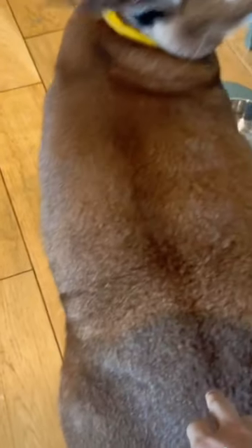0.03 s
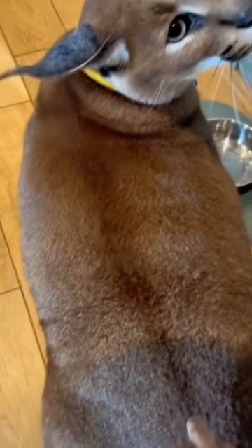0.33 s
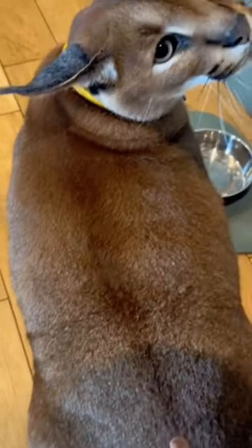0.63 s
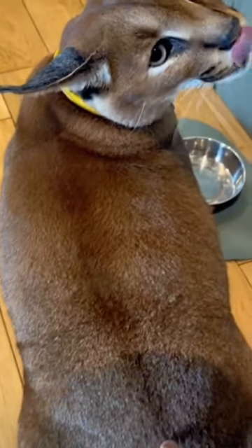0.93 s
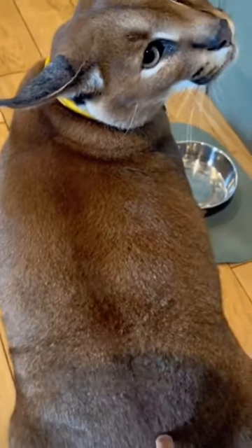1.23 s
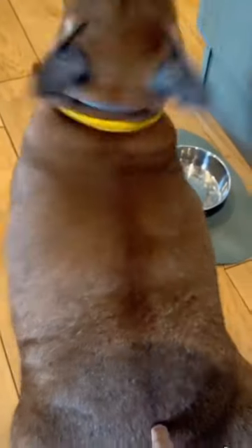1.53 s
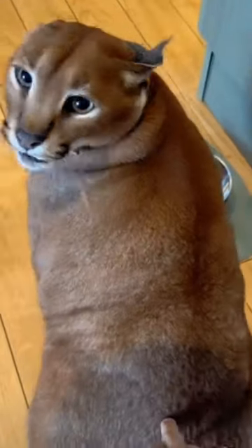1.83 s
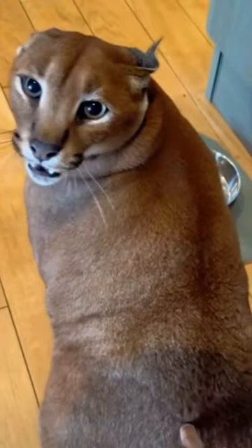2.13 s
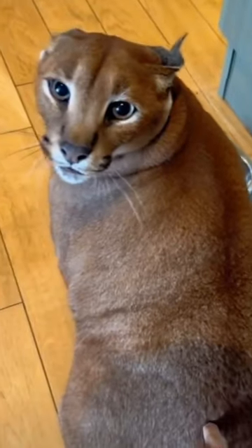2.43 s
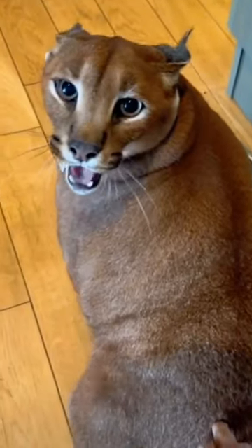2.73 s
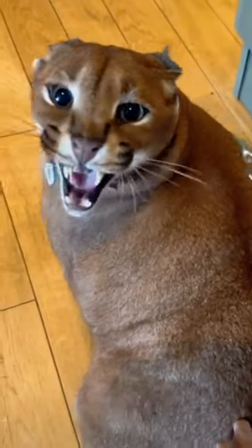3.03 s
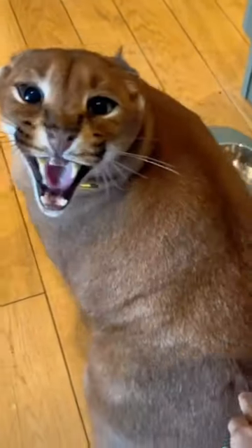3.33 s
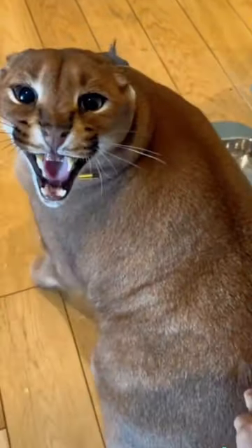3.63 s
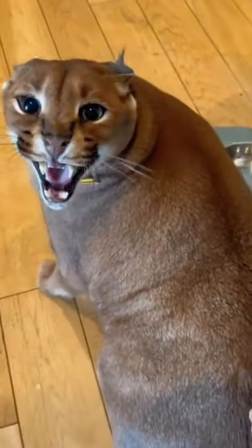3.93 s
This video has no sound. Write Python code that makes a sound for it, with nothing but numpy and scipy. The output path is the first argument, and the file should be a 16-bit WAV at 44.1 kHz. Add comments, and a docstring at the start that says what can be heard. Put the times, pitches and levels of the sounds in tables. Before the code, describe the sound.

A wild cat growls low, licks its lips and slips into a slower, rattling snarl. It draws a breath, then lets out a loud, wet hiss, heard from about a metre away in a quiet room.

```python
"""A wild cat growls and hisses

Pulses of the vocal folds excite chest and throat in a low growl, mouth shut. The cat licks its lips
and bares its teeth in a slower, rattling snarl. It draws air through the opening jaws, then turbulent
flow, shaped by the resonances of the mouth, makes a loud, wet hiss that sinks to a steady rasp.
A quiet room with a wooden floor, heard in mono from about a metre."""
import sys
import numpy as np
from scipy import signal
from scipy.fft import rfft, irfft, next_fast_len
from scipy.io import wavfile
from scipy.ndimage import uniform_filter1d

SR = 44100
rng = np.random.default_rng(int(sys.argv[2]) if len(sys.argv) > 2 else 0)


def store_pcm(level_fs):
    """Save levels as 16-bit WAV."""
    pcm = np.round(np.clip(level_fs, -1, 1) * 32767).astype(np.int16)
    wavfile.write(sys.argv[1], SR, np.atleast_2d(pcm).T)


N = 176400
TIME = np.arange(N) / SR


def hiss():
    """Turbulence excites the vocal tract: a throat blast, a wet rasp and a jet between the teeth."""
    # Each row: time in seconds, then levels of blast, rasp and jet in dB.
    hiss_levels = [(3.042, -58, -63, -67), (3.058, -39, -38.5, -51.5), (3.095, -36, -45.5, -41.5),
                   (3.145, -32, -37.5, -39), (3.2, -33, -38.5, -38), (3.235, -35, -52, -36.5),
                   (3.262, -28, -46, -35.5), (3.295, -30, -36, -32), (3.35, -29, -38, -37.5),
                   (3.4, -35.5, -35, -36.5), (3.46, -40, -37.5, -39.5), (3.53, -61, -38, -43),
                   (3.6, -47, -39, -44), (3.72, -43.5, -40.5, -43.5), (4.0, -50.5, -39, -43)]
    # Spectral envelopes. Each row: frequency in Hz, gain in dB.
    blast_colour = [(100, -24), (220, -4.5), (420, -1.5), (800, 4.5), (930, -2), (1100, 2.5), (1320, 0.5),
                    (1550, 3.5), (2000, 6.5), (2700, 0.5), (3400, -1), (4200, -7), (5500, -20),
                    (11000, -40), (12000, -75)]
    rasp_colour = [(80, -37.5), (200, -6.5), (350, -4.5), (530, 2), (700, -7), (1000, -12.5), (1700, -9.5),
                   (2100, -15), (3000, -12), (4200, -19), (5500, -19.5), (10000, -57), (12000, -85)]
    jet_colour = [(2500, -24.5), (4500, -3.5), (5900, -2.5), (6600, 1), (7600, 6), (9000, 0.5),
                  (11050, -4.5), (11350, -14), (11700, -12.5), (12000, -46), (15000, -33)]
    # Resonances and notches. Each row: centre in Hz, width in Hz, gain in dB.
    blast_peaks = [(431, 113, 10.5), (1112, 72, 8), (1550, 95, 5.5), (2420, 160, 5), (2649, 81, 10),
                   (3160, 65, 7.5)]
    rasp_peaks = [(512, 140, 1.5), (826, 120, 7), (2115, 220, 8), (2650, 82, -4), (4630, 68, 9),
                  (5610, 130, 9)]
    jet_peaks = [(6150, 38, 11.5), (6600, 120, 6.5), (7000, 120, 6), (7370, 320, -4.5), (8680, 160, -2)]
    # A film of spittle gives way. Each row: time in seconds, lift in dB.
    sputters = [(3.199, 2.5), (3.222, 3.5), (3.491, 2.5), (3.732, 1.5), (3.752, 3.5), (3.855, 5.5)]
    sputter_s = .0025
    blast_gain, rasp_gain, jet_gain = levels(hiss_levels)
    blast = colour(airflow(flutter_db=3, flutter_hz=90, wet=.34), blast_colour, blast_peaks)
    rasp = colour(airflow(flutter_db=2.5, flutter_hz=111, wet=.35), rasp_colour, rasp_peaks)
    jet = colour(airflow(flutter_db=1.5, flutter_hz=70.4, wet=.18), jet_colour, jet_peaks)
    stream = blast_gain * evened(blast) + rasp_gain * evened(rasp) + jet_gain * evened(jet) + gape()
    flutter = evened(from_db(.45 * drift(rate_hz=55)))  # the throat shakes the whole airstream
    sputter = from_db(sum(db * np.exp(-((TIME - s) / sputter_s) ** 2) for s, db in sputters))
    return sputter * flutter * stream


def gape():
    """A cavity resonance in the hiss climbs as the jaws widen and drops as they relax."""
    # Each row: time in seconds, resonance in Hz.
    gape_hz = [(3.06, 2100), (3.2, 2250), (3.29, 2750), (3.345, 3700), (3.38, 4702), (3.41, 3302),
               (3.46, 2600)]
    # Each row: time in seconds, level in dB.
    gape_level = [(3.07, -57), (3.2, -39), (3.29, -36.5), (3.375, -34.5), (3.44, -44.5), (3.5, -51)]
    air = airflow(flutter_db=1, flutter_hz=99, wet=.28)
    for _ in range(2):
        air = moving_resonance(air, gape_hz, width_hz=1500)
    return levels(gape_level)[0] * evened(air)


def growl():
    """Source and filter: vocal-fold pulses drive chest and throat. Returns chest and mouth sound."""
    # Each row: time in seconds, chest level in dB, throat level in dB.
    growl_levels = [(0, -43, -48.5), (.3, -40.5, -45.5), (.5, -42, -48), (.88, -47.5, -50), (.95, -42, -48),
                    (1.0, -45.5, -48), (1.09, -53, -48), (1.17, -42.5, -47.5), (1.28, -41, -47.5),
                    (1.45, -45, -48), (1.62, -40.5, -48), (1.72, -44, -50), (1.91, -38.5, -42.5),
                    (2.0, -49, -47), (2.17, -48, -50.5), (2.3, -46.5, -46), (2.57, -48.5, -52.5),
                    (2.615, -56, -66)]
    # Each row: time in seconds, parting of the lips from 0 to 1.
    lips = [(1.8, 0.06), (1.97, 0.98), (2.6, 1)]
    # Spectra of throat and chest, in growl and snarl. Each row: frequency in Hz, gain in dB.
    mouth_shut = [(100, -16.5), (200, -0.5), (250, -0.5), (345, 2), (450, -6.5), (600, -8), (780, -12),
                  (1000, -28), (1250, -45), (1800, -40), (3000, -39.5), (4000, -61), (14000, -77)]
    teeth_bared = [(100, -17.5), (200, -8.5), (290, -2.5), (370, -6.5), (520, 3), (610, -2), (700, -15.5),
                   (1000, -21), (1450, -46), (2000, -29), (2650, -31.5), (3300, -36.5), (6000, -49),
                   (14000, -91)]
    chest_relaxed = [(30, -44.5), (48, -23), (65, 9), (100, -0.5), (140, 4), (200, -11), (300, -20.5),
                     (600, -72), (3000, -100)]
    chest_tensed = [(30, -54), (50, -27), (72, -7), (110, -1.5), (152, 1), (200, -6.5), (300, -30),
                    (600, -59), (3000, -100)]
    beats = fold_beats()
    parted = np.interp(TIME, *np.transpose(lips))
    shut = 1 - parted
    breathiness = .98 * shut + .44 * parted  # the snarl is drier
    uneven_beats = rms_one(beats * from_db(-.2 * rng.standard_normal(N)))
    rattle = uneven_beats + breathiness * puffs(beats, decay_s=.0079)
    throat = shut * colour(rattle, mouth_shut) + parted * colour(rattle, teeth_bared)
    chest = shut * colour(beats, chest_relaxed) + parted * colour(beats, chest_tensed)
    chest_gain, throat_gain = levels(growl_levels)
    voiced = throat_gain * evened(throat) + licks(rattle)
    breath = wheeze(beats)
    roll = from_db(1.5 * np.cos(throb_phase()))
    return roll * chest_gain * evened(chest), roll * (voiced + nose_whistle()) + breath


def fold_beats(count=320):
    """The vocal folds close in a nearly periodic pulse train, with jitter and shimmer."""
    # Each row: time in seconds, closures per second.
    beat_rate = [(0, 92), (.45, 97.6), (.8, 92.3), (1.25, 100), (1.55, 101), (1.88, 110.4), (1.96, 104),
                 (2.04, 76), (2.3, 76), (2.6, 62)]
    sway_periods, wander_periods = .12, .06
    jitter_s, shimmer_db, end_s = .00045, .3, 2.61
    cycles = np.cumsum(np.interp(TIME, *np.transpose(beat_rate))) / SR
    cycles = cycles + sway_periods * np.sin(throb_phase()) + wander_periods * drift(rate_hz=4)
    lateness, strength = rng.standard_normal((count, 2)).T
    closure_s = np.interp(np.arange(count) + .5, cycles, TIME) + jitter_s * lateness
    sounding = closure_s < end_s
    beats = np.zeros(N)
    beats[(closure_s[sounding] * SR).astype(int)] = from_db(shimmer_db * strength[sounding])
    return beats


def throb_phase(first_crest_s=.035):
    """A slow flutter of the throat modulates the growl's level and timing; its phase in radians."""
    # Each row: time in seconds, throbs per second.
    throb_rate = [(0, 16.1), (.45, 16.9), (.7, 12.86), (1.0, 13.94), (1.25, 21), (1.7, 20), (2.3, 19.8),
                  (2.6, 15.5)]
    rate_hz = np.interp(TIME - first_crest_s, *np.transpose(throb_rate))
    return 2 * np.pi * (np.cumsum(rate_hz) / SR - rate_hz[0] * first_crest_s)


def intake():
    """Inhaled turbulence excites a mouth resonance that arches in pitch; the throat joins in late."""
    # Each row: time in seconds, then levels of rushing air, mouth and throat in dB.
    intake_levels = [(2.64, -73, -80, -88), (2.67, -56, -60, -78), (2.72, -48, -46.5, -70),
                     (2.785, -42.5, -42, -64), (2.86, -42.5, -42.5, -60), (2.895, -42.5, -43, -47),
                     (2.945, -40.5, -39.5, -48.5), (3.005, -47, -47.5, -52), (3.035, -61, -60, -70)]
    # Spectrum of the rush. Each row: frequency in Hz, gain in dB.
    rush_colour = [(100, -32), (600, -9), (950, -2.5), (1450, -8.5), (1850, -8), (2100, -4), (2300, -1),
                   (2480, -3), (2720, 3), (3200, -6.5), (3900, -4.5), (4550, -17), (5300, -9),
                   (6400, -24.5), (6900, -19), (7600, -28), (8300, -23), (10000, -28), (12000, -49)]
    # A resonance and a notch. Each row: centre in Hz, width in Hz, gain in dB.
    rush_peaks = [(3656, 132, 7), (4560, 110, -12)]
    # Each row: time in seconds, mouth resonance in Hz.
    mouth_hz = [(2.68, 2080), (2.82, 2165), (2.94, 2160), (3.02, 2110)]
    rush_gain, mouth_gain, throat_gain = levels(intake_levels)
    rush = colour(airflow(flutter_db=0, flutter_hz=70, wet=.18), rush_colour, rush_peaks)
    mouth = rng.standard_normal(N)
    for _ in range(2):
        mouth = moving_resonance(mouth, mouth_hz, width_hz=200)
    throat = narrow_air(centre_hz=1174, width_hz=110)
    return rush_gain * rush + mouth_gain * evened(mouth) + throat_gain * throat


def smacks(rise_s=.0028):
    """Wet tongue and lips come unstuck in noise transients that decay exponentially."""
    # Each row: start in seconds, level in dB, decay time in seconds.
    clicks = [(.932, -66.5, 0.014), (0.943, -61, 0.0078), (1.862, -70, .008), (1.888, -52, 0.013),
              (1.912, -65, 0.08), (2.004, -55.5, .006), (2.013, -54.5, 0.0087), (2.026, -55.5, 0.027),
              (2.078, -69, .025), (3.066, -44, 0.028)]
    # Each row: frequency in Hz, gain in dB.
    smack_colour = [(100, -33), (500, -9), (1700, -9), (3000, 3.5), (5400, -5), (6400, 9.5), (7500, 1),
                    (10000, 2), (12000, -4), (15500, -7)]
    envelope = np.zeros(N)
    for start_s, db, decay_s in clicks:
        age = TIME - start_s
        attack = np.clip(age / rise_s, 0, 1)
        decay = np.exp(-np.clip((age - rise_s) / decay_s, 0, 20))
        envelope += from_db(db) * attack * decay
    return envelope * colour(airflow(flutter_db=2, flutter_hz=200, wet=.4), smack_colour)


def licks(rattle):
    """Each flick of the tongue opens the mouth, which briefly radiates the throat's rattle."""
    # Each row: centre in seconds, half-width in seconds, level in dB.
    flicks = [(0.933, 0.031, -48), (1.02, 0.033, -49), (1.172, 0.062, -51)]
    # Each row: frequency in Hz, gain in dB.
    lick_colour = [(200, -24), (450, 0), (600, -2), (750, -7.5), (1000, -15), (1400, -32), (2500, -32.5),
                   (4000, -42), (9000, -53)]
    opening = sum(from_db(db) * np.exp(-((TIME - s) / half_s) ** 2) for s, half_s, db in flicks)
    return opening * evened(colour(rattle, lick_colour))


def wheeze(beats):
    """Friction noise at constrictions: air streams through the nose and puffs past the teeth."""
    # Each row: time in seconds, nose level in dB, teeth level in dB.
    wheeze_levels = [(0, -71.5, -73), (.3, -71, -90), (.7, -71.5, -100), (1.0, -76, -97),
                     (1.26, -70.5, -98), (1.55, -73.5, -103), (1.82, -72.5, -75.5), (1.97, -72, -61.5),
                     (2.17, -85, -64), (2.32, -76, -63), (2.46, -75, -65), (2.6, -73, -82)]
    # Each row: frequency in Hz, gain in dB.
    nose_colour = [(900, -19), (1800, -12.5), (2250, -3), (2600, -4), (3000, -4.5), (3500, -18.5),
                   (6000, -15.5), (7400, -35), (8600, -10.5), (11000, -28)]
    # Nasal resonance. Each row: centre in Hz, width in Hz, gain in dB.
    nose_peaks = [(2167, 160, 7)]
    # Each row: time in seconds, resonance behind the teeth in Hz.
    teeth_hz = [(1.92, 1730), (2.1, 2200), (2.3, 2020), (2.41, 1810), (2.47, 1710)]
    nose_gain, teeth_gain = levels(wheeze_levels)
    nose = colour(rng.standard_normal(N), nose_colour, nose_peaks)
    teeth = moving_resonance(puffs(beats, decay_s=.0092), teeth_hz, width_hz=280)
    return nose_gain * nose + teeth_gain * teeth


def nose_whistle():
    """A narrow nasal resonance picks a thin tone out of the breath; it swells and fades."""
    # Each row: time in seconds, level in dB.
    whistle_level = [(.15, -88), (.23, -76), (.63, -74.5), (.9, -76), (1.08, -90)]
    return levels(whistle_level)[0] * narrow_air(centre_hz=2920, width_hz=190)


def reflections(x, t60_s=.2, delay_s=.00602, wall_cutoff_hz=2140):
    """Reverberation: dense echoes decay exponentially, and the walls absorb their treble."""
    age = TIME[:SR]
    tail = rng.standard_normal(SR) * from_db(-60 * age / t60_s) * (age > delay_s)
    tail = signal.lfilter(*signal.butter(1, wall_cutoff_hz, fs=SR), tail / np.linalg.norm(tail))
    return from_db(-7.5) * signal.fftconvolve(x, tail)[:N]


def room_tone():
    """Stationary noise, strongest in the bass, is the hush of the room."""
    # Each row: frequency in Hz, gain in dB.
    hush_colour = [(25, -27), (45, -22), (65, 15), (105, 16.5), (180, 8), (500, 7.5), (1000, -4.5),
                   (2000, -16.5), (3500, -19), (6600, -21), (7400, -28), (8400, -20.5), (9500, -27.5),
                   (11500, -40), (15000, -52)]
    return from_db(-55.5) * colour(rng.standard_normal(N), hush_colour)


def airflow(flutter_db, flutter_hz, wet):
    """Turbulence as amplitude-modulated noise, with random impulses of bursting spittle."""
    drops_per_s, spread_db = 500, 3.5
    air = rms_one(rng.standard_normal(N) * from_db(flutter_db * drift(flutter_hz)))
    sizes = from_db(spread_db * np.minimum(rng.exponential(1, N), 4)) * rng.choice([-1, 1], N)
    bursting = rng.random(N) < drops_per_s / SR
    return air + wet * rms_one(sizes * bursting)


def puffs(beats, decay_s):
    """Each pulse releases a puff of turbulence that decays exponentially."""
    envelope = signal.lfilter([1], [1, -np.exp(-1 / (decay_s * SR))], beats + 1e-18)
    return rms_one(envelope * rng.standard_normal(N))


def narrow_air(centre_hz, width_hz):
    """A resonance passes one narrow band of steady air noise."""
    edges_hz = centre_hz * np.exp(np.array([-.5, .5]) * width_hz / centre_hz)
    band = signal.butter(2, edges_hz, "band", fs=SR, output="sos")
    return evened(signal.sosfilt(band, rng.standard_normal(N)))


def moving_resonance(x, glide, width_hz, block=128):
    """A two-pole resonator whose centre glides through rows of seconds and Hz; unit power out."""
    out, state = np.zeros(N), np.zeros(2)
    radius = np.exp(-np.pi * width_hz / SR)
    angle = 2 * np.pi * np.interp(TIME, *np.transpose(glide)) / SR
    for i in range(0, N, block):
        feedback = [1, -2 * radius * np.cos(angle[i]), radius * radius]
        out[i:i + block], state = signal.lfilter([1], feedback, x[i:i + block], zi=state)
    return rms_one(out)


def colour(x, points, peaks=()):
    """A minimum-phase filter with a broad envelope and narrow peaks or notches; unit power out."""
    size = 2 * next_fast_len(N // 2 + SR // 4, True)
    hz = np.maximum(np.arange(size // 2 + 1) * SR / size, 1)
    point_hz, point_db = np.transpose(points)
    db = np.interp(np.log(hz), np.log(point_hz), point_db)
    for centre, width, lift in peaks:
        db += lift / (1 + (2 * (hz - centre) / width) ** 2)
    cepstrum = irfft(np.log(from_db(db)))
    cepstrum[1:size // 2] *= 2  # folding the cepstrum makes the filter causal
    cepstrum[size // 2 + 1:] = 0
    return rms_one(irfft(rfft(x, size) * np.exp(rfft(cepstrum)))[:N])


def drift(rate_hz, hop=40, settle=2000):
    """Low-passed noise gives a smooth random fluctuation of unit power."""
    pole = np.exp(-2 * np.pi * rate_hz * hop / SR)
    noise = rng.standard_normal(N // hop + settle + 2)
    slow = signal.lfilter([1], [1, -2 * pole, pole * pole], noise)[settle:]
    return np.interp(np.arange(N) / hop, np.arange(len(slow)), rms_one(slow))


def levels(rows):
    """One amplitude envelope per dB column, dying away quickly outside the listed times."""
    s, *columns = np.transpose(rows)
    outside_s = np.maximum(s[0] - TIME - .03, 0) + np.maximum(TIME - s[-1] - .03, 0)
    return [from_db(np.interp(TIME, s, db)) * np.exp(-100 * outside_s) for db in columns]


def evened(x, span_s=.06):
    """Even air pressure holds the power steady over a short span; faster grain stays."""
    power = uniform_filter1d(x ** 2, int(span_s * SR))
    return x / np.sqrt(np.maximum(power, .01 * np.mean(x ** 2)))


def rms_one(x):
    """Scale to unit power."""
    return x / np.sqrt(np.mean(x ** 2) + 1e-20)


def from_db(db):
    """Decibels to amplitude ratio."""
    return 10 ** (np.asarray(db) / 20)


def scene():
    """Superposition of the cat, the reflections of its mouth sound and the hush, in two equal channels."""
    chest, throat = growl()
    mouth = throat + intake() + hiss() + smacks()
    hush = room_tone()
    return np.tile(chest + mouth + reflections(mouth) + hush, (2, 1))


def record(dry):
    """A steep elliptic low-pass filter limits the bandwidth."""
    cutoff_hz = 15700
    return signal.sosfilt(signal.ellip(10, .1, 80, cutoff_hz, fs=SR, output="sos"), dry)


dry = scene()
out = record(dry)
store_pcm(out)
```